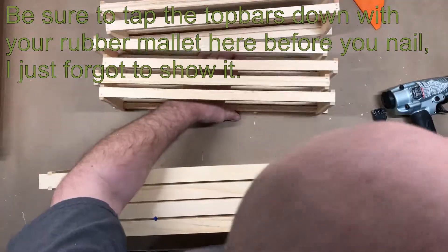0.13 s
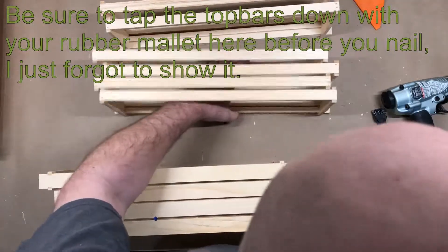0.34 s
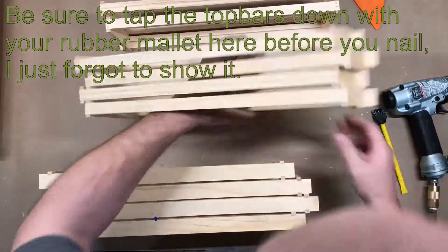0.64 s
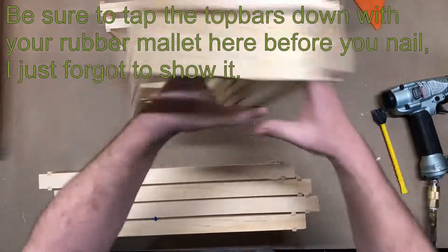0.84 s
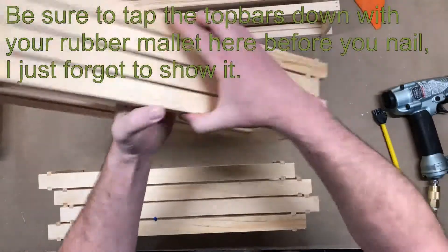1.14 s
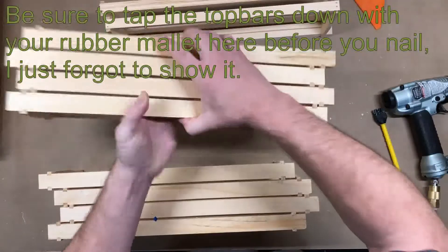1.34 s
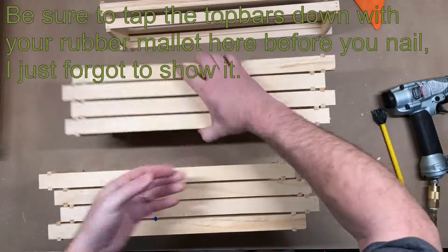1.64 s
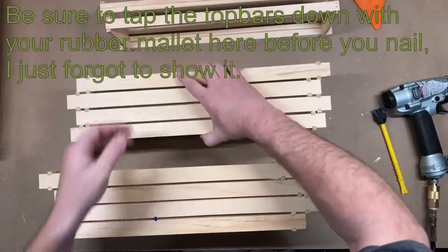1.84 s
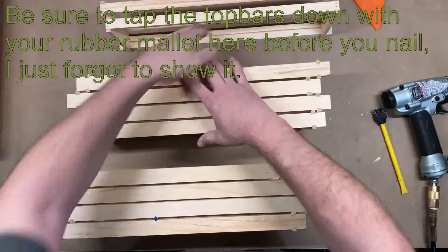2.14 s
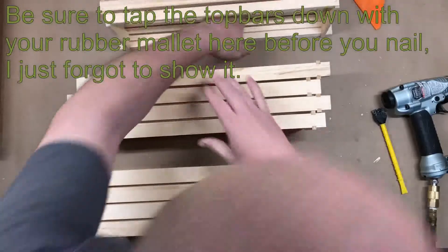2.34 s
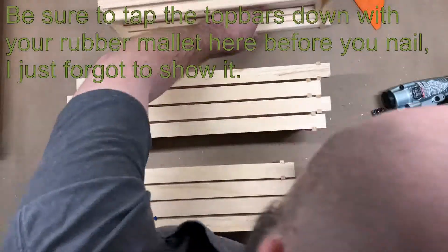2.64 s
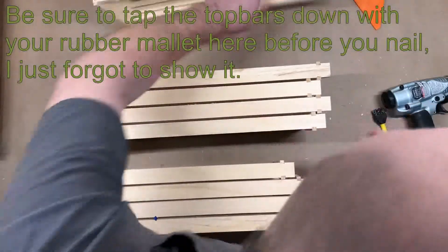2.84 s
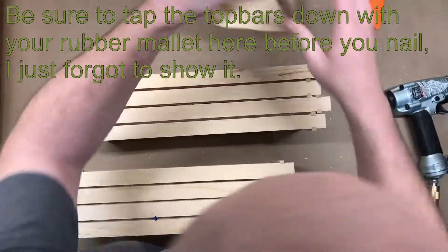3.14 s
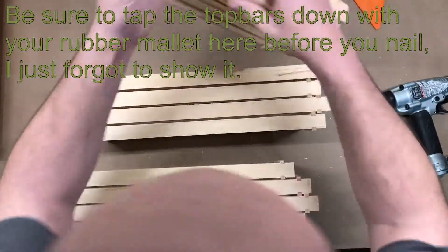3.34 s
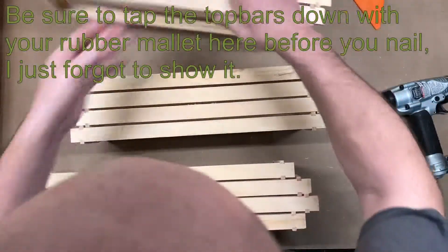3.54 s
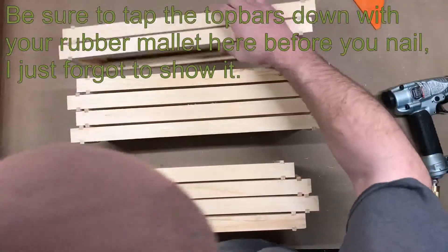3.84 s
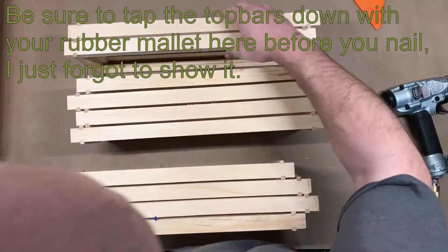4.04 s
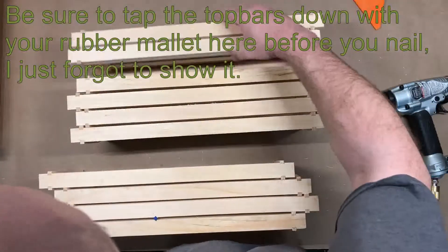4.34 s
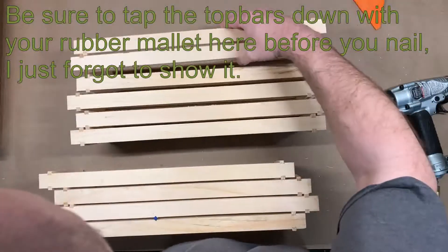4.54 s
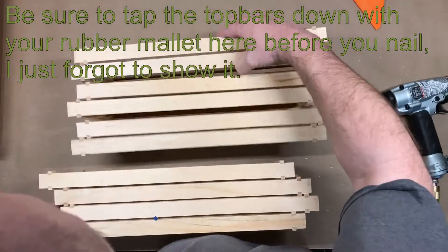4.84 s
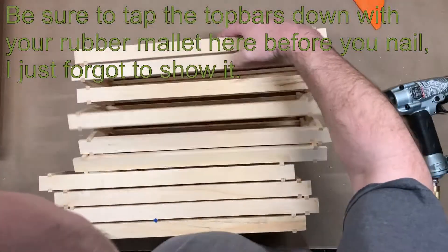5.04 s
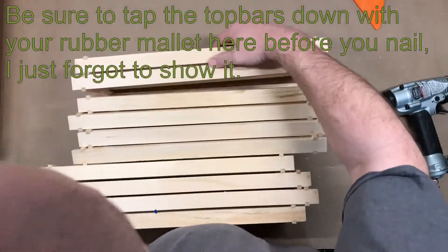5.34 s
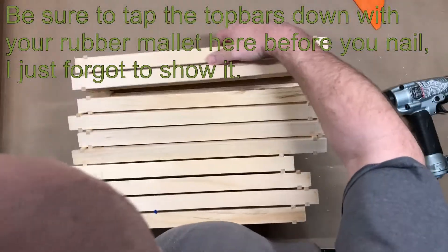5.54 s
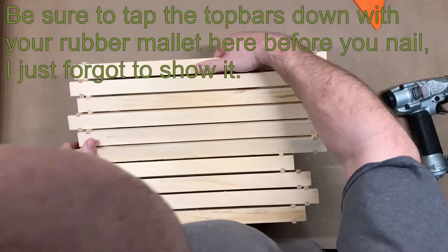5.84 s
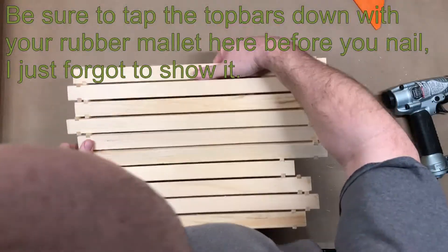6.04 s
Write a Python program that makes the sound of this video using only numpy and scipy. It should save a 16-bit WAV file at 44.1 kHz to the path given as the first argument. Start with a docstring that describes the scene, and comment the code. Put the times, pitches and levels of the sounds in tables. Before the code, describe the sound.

A close microphone over a workbench in a workshop with short, diffuse echoes and a barely audible fan hum. From 0 to 0.6 s, hands brush wood and a light rattling clack comes near 0.3; low air movement presses on the microphone. Soft rubbing continues, with a faint click at 1.35. At 1.7 a frame lands with a very loud, low hollow knock, followed by a slightly higher one at 1.78. Small ticks follow at 2.05 and 2.2, then a crisp, bright clatter of slats around 2.5 to 2.7. Quiet until a tiny high squeak at 3.2. Dull knocks at 3.8 and 4.0 surround a singing scrape; breathy sliding and modest knocks follow at 4.3 to 4.5. A clack at 4.77 leads to a loud dry burst at 4.97 to 5.15. Lighter knocks come at 5.3, 5.6 and 5.7, then a steady hissing, rasping slide to the end.

```python
"""Light wooden frames on a workbench.

Frames are flipped, set down and pushed together; a fan hums faintly in the workshop air.
Each contact is a burst of tiny impacts driving slat, frame and bench modes, plus a treble crack.
Hands and slats slide on wood: shaped noise hisses and rasps, and single slat modes sing.
Draughts and an early slow rocking load the microphone; decaying noise makes the workshop's echoes."""
import sys
import numpy as np
from scipy import signal
from scipy.fft import rfft, irfft, next_fast_len
from scipy.io import wavfile
from scipy.ndimage import uniform_filter1d, map_coordinates

SR = 44100
rng = np.random.default_rng(int(sys.argv[2]) if len(sys.argv) > 2 else 0)


def output_pcm(signal):
    """Save a mono or channel-first signal as 16-bit PCM at the path in sys.argv[1].

    Samples are clipped to [-1, 1] before scaling.
    """
    pcm = np.clip(np.atleast_2d(signal).T, -1, 1) * 32767
    wavfile.write(sys.argv[1], SR, np.round(pcm).astype(np.int16))


N = 272890


def amp(db):
    """Decibels to gain."""
    return 10 ** (np.asarray(db) / 20)


def unit(x):
    """Scaled to rms 1."""
    return x / np.sqrt(np.mean(x ** 2) + 1e-20)


def along(points, hz):
    """Interpolates (Hz, value) points on a log frequency axis."""
    point_hz, values = np.transpose(points)
    return np.interp(np.log(hz + .1), np.log(point_hz + .1), values)


def wobble(rate_hz):
    """A smooth random curve with rate_hz knots a second."""
    knots = rng.standard_normal(int(N * rate_hz / SR) + 4)
    return map_coordinates(knots, [np.arange(N) * rate_hz / SR])


def filtered(x, response):
    """x times a response of frequency, zero-padded."""
    m = next_fast_len(N + SR // 2)
    spectrum = rfft(x, m) * response(np.fft.rfftfreq(m, 1 / SR))
    return irfft(spectrum, m)[..., :N]


def coloured(x, spectrum):
    """x shaped by a spectrum in dB, at rms 1."""
    return unit(filtered(x, lambda hz: amp(along(spectrum, hz))))


# Spectrum of the workshop air and fan. Each row: frequency in Hz, relative level in dB per Hz.
AIR_SPECTRUM = [(15, -42), (25, 9.5), (37, -33), (55, -0.5), (169, -39.5), (548, -28.5), (750, -44),
                (975, -37), (1410, -49.5), (7500, -45.5), (12000, -90), (13000, -73)]
AIR_RMS_DB = -48
HUM_HZ, HUM_PEAK_DB = 120, -59  # mains hum of the fan


def workshop_air():
    """Steady room noise plus a hum with slightly unsteady level and phase."""
    hum_gain = amp(HUM_PEAK_DB + 0.79 * wobble(3.85))
    hum_phase = 2 * np.pi * HUM_HZ * np.arange(N) / SR + 0.32 * wobble(2.2)
    air_gain = amp(AIR_RMS_DB + 1.3 * wobble(2.23))
    air = air_gain * coloured(rng.standard_normal(N), AIR_SPECTRUM)
    return air + hum_gain * np.sin(hum_phase)


# Draught level. Each row: time in seconds, rms level in dB.
DRAUGHT_LEVEL = [(0.0, -37), (0.24, -12.5), (0.45, -26.5), (0.88, -33.5), (1.08, -32), (1.8, -34.5),
                 (3.0, -29), (3.29, -29), (3.53, -37), (4.01, -22), (4.27, -37.5), (4.46, -25.5),
                 (5.01, -34), (5.65, -23), (5.81, -35), (6.19, -28)]
# Draught spectrum. Each row: frequency in Hz, relative level in dB per Hz.
GUST_SPECTRUM = [(1, 24.5), (3.5, 20), (8, 6), (20, 9), (35, -55.5)]
SWAY_HZ, SWAY_DB, SWAY_CREST_S, SWAY_REST_S = 3.4, -14, .095, 1.05


def draught():
    """Air pushed by the moving frames, and an early rocking, load the microphone mostly below hearing."""
    t = np.arange(N) / SR
    turn = 2 * np.pi * SWAY_HZ * (t - SWAY_CREST_S)
    extent = np.sin(np.pi * np.clip(t / SWAY_REST_S, 0, 1)) ** 0.82
    rocking = extent * (np.cos(turn) - 0.25 * np.cos(2 * turn))  # troughs sharper than crests
    knot_s, knot_db = np.transpose(DRAUGHT_LEVEL)
    gusts = amp(np.interp(t, knot_s, knot_db)) * coloured(rng.standard_normal(N), GUST_SPECTRUM)
    return amp(SWAY_DB) * rocking + gusts


# Workshop reverberation. Each row: frequency in Hz, t60 in seconds.
SHOP_T60 = [(100, 0.46), (500, 0.54), (2000, 0.59), (5000, 0.6), (12000, 0.35)]
TAIL_REDRAW_S = .25  # a fresh noise tail is drawn this often, so the echoes stay diffuse


def room(x):
    """Noise tails as echoes: each frequency of the workshop's answer dies at its own speed."""
    out, step = np.zeros(N + 2 * SR), round(TAIL_REDRAW_S * SR)
    for start in range(0, N, step):
        hz, t, z = signal.stft(rng.standard_normal(SR * 3 // 4), SR, nperseg=256)
        decay = amp(-60 * t / along(SHOP_T60, hz)[:, None])
        tail = signal.istft(z * decay, SR, nperseg=256)[1]
        wet = signal.fftconvolve(x[start:start + step], tail / np.linalg.norm(tail))
        out[start + 300:][:len(wet)] += wet  # echoes lag by 300 samples
    return out[:N]


STROKE_SWING_DB = 26.5  # gained over a rise, lost over a fall


def strokes(rows):
    """Every stroke speeds up, holds and slows down; powers add into one gain for each level column."""
    full_s, rise_s, hold_s, fall_s, *levels_db = np.transpose(rows)[:, :, None]
    t = np.arange(0, N + 64, 32) / SR
    rising = (t - full_s) / abs(rise_s)
    falling = (full_s + hold_s - t) / abs(fall_s)
    speed_db = STROKE_SWING_DB * np.minimum(0, np.minimum(rising, falling))
    powers = [amp(2 * (db + speed_db)).sum(0) for db in levels_db]
    return [np.sqrt(np.interp(np.arange(N) / SR, t, power)) for power in powers]


def patchy(x, depth_db):
    """Narrow bands swell and fade for a tenth of a second as the grain of the wood passes."""
    z = signal.stft(x, nperseg=512)[2]
    field = uniform_filter1d(rng.standard_normal(z.shape), size=4, axis=0)  # over frequency
    field = uniform_filter1d(field, size=18, axis=1)  # over time
    return signal.istft(z * amp(depth_db * unit(field)), nperseg=512)[1][:N]


# Strokes of hand or slat over wood. Each row: start of full speed in seconds, rise in seconds,
# hold in seconds, fall in seconds, hiss level in dB, slat rasp level in dB.
STROKES = [(0, .01, 0.023, 0.056, -40, -45), (.05, .03, 0.081, 0.12, -60, -53),
           (0.231, .08, 0.053, .03, -53, -53), (0.297, .015, 0.048, 0.049, -52, -46),
           (0.557, .01, .005, 0.057, -60, -56), (0.617, .01, 0.067, 0.018, -60, -59.5),
           (0.884, 0.19, 0.023, 0.065, -50.5, -55.5), (0.967, .06, 0.068, 0.093, -55, -57),
           (1.107, 0.2, 0.046, 0.13, -62, -53), (1.227, 0.12, 0.018, 0.043, -49.5, -48),
           (1.276, 0.022, .005, 0.035, -53, -49), (1.332, 0.048, 0.03, 0.022, -44, -56),
           (2.022, 0.011, 0.006, 0.09, -57, -54), (2.174, 0.014, 0.064, 0.1, -49.5, -66),
           (2.428, .008, 0.025, 0.05, -46, -52), (2.543, .1, 0.01, 0.09, -38.5, -61),
           (2.96, 0.17, 0.033, 0.13, -65.5, -60), (3.032, .04, 0.12, .06, -58.5, -56.5),
           (3.202, 0.0044, 0.034, 0.018, -37, -67), (3.28, .03, 0.12, 0.04, -57, -76),
           (3.566, 0.13, 0.016, 0.09, -63, -62), (3.809, .01, 0.0049, 0.038, -39, -46),
           (3.873, .06, .01, 0.089, -49, -56), (3.952, .08, 0.035, 0.15, -44.5, -49.5),
           (4.145, .05, 0.0064, 0.027, -59, -60), (4.274, 0.081, 0.026, 0.26, -35.5, -72),
           (4.428, 0.065, 0.074, 0.023, -48, -46.5), (4.537, .03, 0.043, .08, -65, -58),
           (4.745, 0.094, 0.028, 0.028, -39, -51), (4.798, .03, .03, .12, -56, -55),
           (4.944, 0.11, 0.047, .03, -50.5, -58), (5.187, 0.15, 0.012, 0.25, -53.5, -62),
           (5.527, 0.071, 0.13, .1, -53.5, -62.5), (5.658, 0.13, 0.014, 0.16, -41.5, -50),
           (5.76, .05, 0.036, .1, -55.5, -72), (5.945, 0.13, 0.24, .05, -37, -41.5)]
# Hiss spectrum. Each row: frequency in Hz, relative level in dB per Hz.
HISS_SPECTRUM = [(880, -9), (1500, -11.5), (1640, -4.5), (2110, -10), (4680, -0.5), (9650, -7),
                 (12100, -14.5), (13000, -23)]
# Rasp spectrum, the slats' resonances. Each row: frequency in Hz, relative level in dB per Hz.
RASP_SPECTRUM = [(200, 0), (370, -3.5), (590, -8.5), (900, -3.5), (1300, -6), (1750, -6), (2200, -12),
                 (3200, -11), (4500, -50)]
IDLE_RASP_DB = -64  # hands never lie quite still on the slats


def sliding():
    """Fibres catch and slip: dense grains hiss, and the slats rasp in their own resonances."""
    hiss_gain, rasp_gain = strokes(STROKES)
    rasp_gain = np.hypot(rasp_gain, amp(IDLE_RASP_DB))
    flicker_db = 1.06 * np.array([wobble(400), wobble(130)])
    hiss_grains, rasp_grains = rng.standard_normal((2, N)) * amp(flicker_db)
    hiss = coloured(patchy(hiss_grains, depth_db=2.0), HISS_SPECTRUM)
    rasp = coloured(patchy(rasp_grains, depth_db=4.5), RASP_SPECTRUM)
    return hiss_gain * amp(1.8 * wobble(45)) * hiss + rasp_gain * amp(1.05 * wobble(35)) * rasp


# Dragged slats singing. Each row: start of full speed in seconds, rise in seconds, hold in seconds,
# fall in seconds, level in dB, mode in Hz.
SINGS = [(.87, .04, 0.035, .04, -61, 1840), (3.207, .006, 0.01, .01, -39, 4800),
         (3.215, .008, 0.013, .015, -36, 7160), (3.935, 0.043, 0.053, 0.084, -47.5, 1810),
         (3.94, .04, 0.06, .04, -47.5, 4560), (3.953, .05, 0.045, .05, -46, 6800),
         (4.91, 0.046, 0.028, .03, -59, 1800)]
SING_WIDTH = 0.055  # offset to half amplitude, over the mode's frequency


def singing():
    """Friction noise caught in one slat mode, as a slat is dragged."""
    out = np.zeros(N)
    for *stroke, mode_hz in SINGS:
        noise = rng.standard_normal(N)
        tone = filtered(noise, lambda hz: 1 / (1 + ((hz / mode_hz - 1) / SING_WIDTH) ** 2))
        out += strokes([stroke])[0] * unit(tone)
    return out


def ring(modes, force, scatter_db):
    """Decaying sines, at new strengths for each blow, driven by a force; half a second, peak 1."""
    hz, db, t60_s = np.transpose(modes)[:, :, None]
    t = np.arange(round(min(t60_s.max(), .5) * SR)) / SR
    blow_db = db + scatter_db * rng.standard_normal(hz.shape)
    waves = amp(blow_db - 60 * t / t60_s) * np.sin(2 * np.pi * hz * t)
    x = signal.fftconvolve(waves.sum(0), force)[:SR // 2]
    return np.pad(x, (0, SR // 2 - len(x))) / np.abs(x).max()


# Bending modes of free slats. Each row: frequency in Hz, level in dB, t60 in seconds.
SLATS = [(310, -3, .04), (380, -1, .05), (450, -3, .04), (520, -1, .05), (620, -3, .04), (730, -3, .04),
         (820, -1, .045), (900, -2, .04), (1010, -3, .04), (1160, -5, .03), (1340, -2, .035),
         (1590, 0, .04), (1790, -1, .035), (2000, 0, .04), (2270, -1, .03), (2490, -3, .025),
         (2900, -4, .02), (3130, -2, .025), (3450, -3, .02), (3900, -5, .015), (4300, -6, .012),
         (4750, -6, .012)]
STACK_DAMPING = .75  # t60 factor: slats pressed against neighbours ring shorter than free ones


def struck(centre_hz, narrow_db, low_side):
    """Where a blow lands decides which slat modes answer; the many joints add short modes of their own."""
    joints = [(centre_hz * 2 ** octave, -2, .018) for octave in rng.normal(0, .6, size=40)]
    modes = []
    for hz, db, t60_s in SLATS + joints:
        side = low_side if hz < centre_hz else 1
        loss_db = narrow_db * side * np.log2(hz / centre_hz) ** 2
        modes.append((hz, db - loss_db, STACK_DAMPING * t60_s))
    return modes


# Contacts. Each row: start in seconds, clack level in dB, clack centre in Hz, hollow knock level in dB,
# knock centre in Hz, free ring level in dB, bench thump level in dB, crack level in dB,
# contact length scale in seconds.
KNOCKS = [(0.247, -36.5, 3270, -39.5, 630, -44, -35.5, -60, 0.017),
          (0.29, -26, 2110, -51, 940, -26.5, -35, -68, 0.021),
          (.385, -42, 1900, -50, 990, -36, -41, -63, 0.0091),
          (.487, -60, 3940, -44, 930, -59, -48, -39.5, 0.0039),
          (1.355, -36.5, 2030, -31, 1000, -33, -57, -46, 0.012),
          (1.698, -58, 2070, -0.5, 465, -48, -6.5, -13, .004),
          (1.782, -37, 1500, -4.5, 760, -50, -15, -17.5, 0.0063),
          (2.055, -44, 1960, -38, 500, -68, -34, -37.5, 0.013),
          (2.224, -26, 1610, -53, 895, -32, -41, -36, 0.0047),
          (2.263, -39, 1500, -44, 950, -48, -55, -51, .01),
          (2.423, -43, 3430, -43.5, 470, -67, -48, -40.5, 0.025),
          (2.514, -30, 3230, -40, 534, -42, -40.5, -28, 0.017),
          (2.565, -7.5, 2810, -65, 960, -29, -56, -48, 0.0076),
          (2.609, -14, 2980, -72, 810, -31.5, -45, -32, .004),
          (2.643, -13.5, 2440, -71, 830, -52, -57, -49, .005),
          (2.671, -13.5, 2610, -62, 850, -26.5, -49, -40, 0.0032),
          (3.202, -38.5, 2450, -68, 940, -45, -65, -42, 0.023),
          (3.802, -35, 2120, -21, 350, -35.5, -31.5, -38, 0.0097),
          (3.994, -44, 1930, -15, 330, -37, -28, -30.5, 0.011),
          (4.391, -24.5, 1550, -22, 900, -46, -34, -26, 0.0081),
          (4.487, -43, 1430, -18, 420, -52, -29, -27.5, 0.0043),
          (4.709, -44, 2480, -33.5, 496, -45, -39, -35, 0.0097),
          (4.766, -17.5, 1700, -63, 925, -39, -36.5, -46, 0.0046),
          (4.970, -7.5, 1980, -19.5, 830, -18.5, -36, -20.5, 0.011),
          (4.994, -2, 1925, -12.5, 570, -54, -36, -29.5, 0.0071),
          (5.046, -36, 2180, -30, 700, -55, -33, -38, .01),
          (5.101, -57, 1720, -17, 685, -43, -24, -26, 0.018),
          (5.114, -14, 1740, -31, 613, -46, -28, -61, 0.0048),
          (5.135, -47, 1830, -21, 610, -58, -21, -44, 0.0083),
          (5.309, -23.5, 1450, -19, 604, -41, -25.5, -42.5, 0.0097),
          (5.626, -30, 1400, -25.5, 420, -36, -26.5, -48, 0.0099),
          (5.716, -45, 1940, -32, 810, -42, -31.5, -43, 0.0067),
          (5.811, -31, 1670, -38, 910, -63, -63, -38, 0.0032),
          (5.858, -54, 2070, -35, 390, -45, -39, -52, 0.0084)]
# A whole frame hanging free. Each row: frequency in Hz, level in dB, t60 in seconds.
FRAME = [(360, -6, .3), (373, -9, .22), (870, -10, .3), (925, -8, .3), (968, -4, .3), (992, -2, .36),
         (1180, -12, .3), (1580, -9, .2), (1700, -11, .25), (2290, -14, .14)]
# Bench top modes. Each row: frequency in Hz, level in dB, t60 in seconds.
BENCH = [(84.7, -1.5, 0.3), (123.7, -5.5, 0.21), (145, 20, 0.062), (196.5, 4.5, 0.28), (236, -43, 0.015),
         (304, 3, 0.05)]
# The bench bouncing on its legs. Each row: frequency in Hz, level in dB, t60 in seconds.
LEGS = [(48.4, 26, 1), (52.4, -17, 0.95)]
BOOM_DB = -15  # leg bounce relative to the thump of the top
LOW_SIDE = 2.9  # modes under the centre of a clack lose this many times more dB than those above
PRESS_RISE = 0.35  # the slats meet one after another: rise constant over contact length


def knocks():
    """A contact is a quick run of tiny impacts as several slats meet."""
    out, t = np.zeros(N + SR), np.arange(SR // 8) / SR
    treble = signal.butter(2, [2800, 6800], "band", fs=SR, output="sos")
    push = np.gradient(t * np.exp(-t / 0.0015))  # the bench takes one soft push and springs back
    tap = t * np.exp(-t / 0.00004)  # one hard touch sets the whole frame ringing
    shove = t * np.exp(-t / 0.002)  # drives the legs
    for (start_s, clack_db, clack_hz, hollow_db, hollow_hz,
         ring_db, thump_db, crack_db, length_s) in KNOCKS:
        length_s = max(length_s, .001)
        press = np.exp(-(t / (1.35 * length_s)) ** 1.25) * (1 - np.exp(-t / (PRESS_RISE * length_s)))
        force = press * rng.standard_normal(len(t)) * rng.exponential(size=len(t)) ** 1.25
        crack = signal.sosfilt(treble, force)
        clack_modes = struck(clack_hz, narrow_db=10, low_side=LOW_SIDE)
        hollow_modes = struck(hollow_hz, narrow_db=15, low_side=1)
        at = out[round(start_s * SR):]
        at[:SR // 2] += amp(clack_db) * ring(clack_modes, force, scatter_db=2.5)
        at[:SR // 2] += amp(hollow_db) * ring(hollow_modes, force, scatter_db=2.5)
        at[:SR // 2] += amp(ring_db) * ring(FRAME, tap, scatter_db=2.5)
        at[:SR // 2] += amp(thump_db) * ring(BENCH, push, scatter_db=2.5)
        at[:SR // 2] += amp(thump_db + BOOM_DB) * ring(LEGS, shove, scatter_db=1)
        at[:len(t)] += amp(crack_db) * crack / np.abs(crack).max()
    return out[:N]


def scene():
    """Near sounds, their reverberation and the background."""
    background = workshop_air() + draught()
    rubs = sliding() + singing()
    hits = knocks()
    echoes = room(amp(-9) * hits + amp(-12.5) * rubs)
    return (hits + rubs + echoes + background)[None]


TOP_HZ = 12750


def record(dry):
    """The input stage rounds off the loudest peaks; nothing is kept above the band limit."""
    soft = dry / (1 + np.abs(dry / .9) ** 4) ** (1 / 4)
    return filtered(soft, lambda hz: hz < TOP_HZ)


dry = scene()
out = record(dry)
output_pcm(out)
```